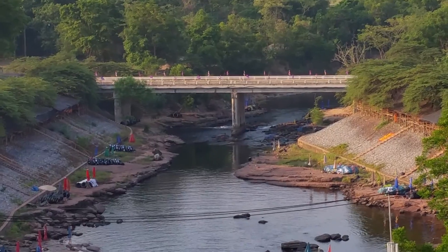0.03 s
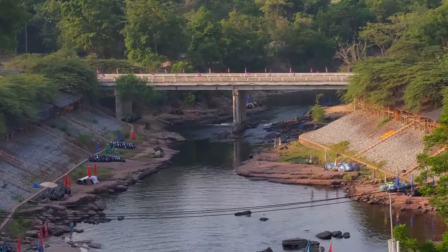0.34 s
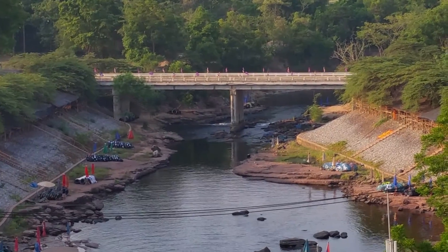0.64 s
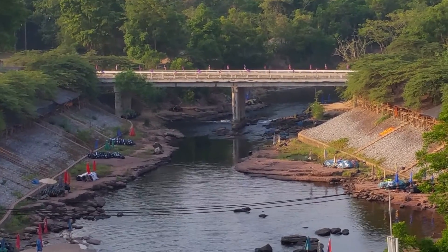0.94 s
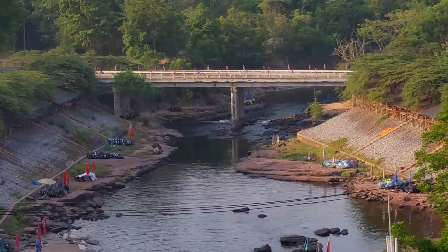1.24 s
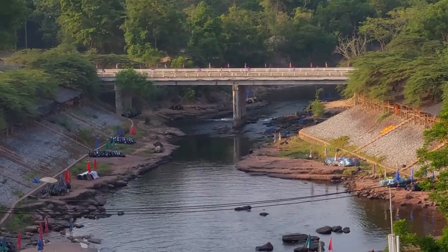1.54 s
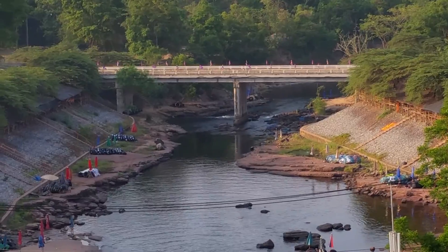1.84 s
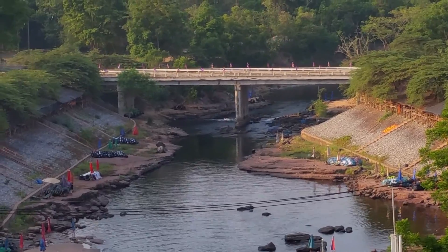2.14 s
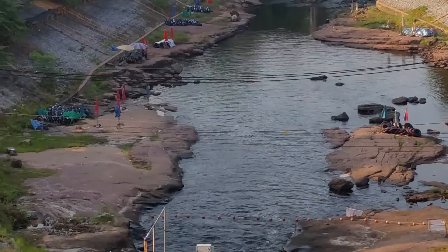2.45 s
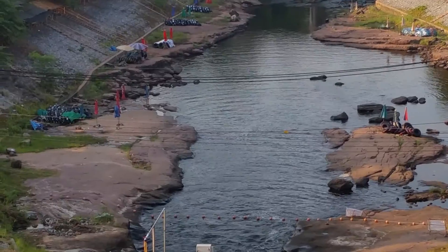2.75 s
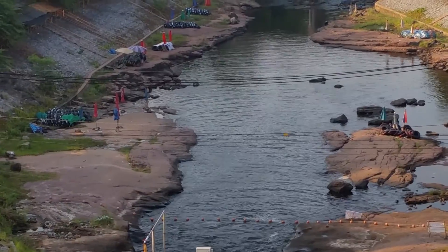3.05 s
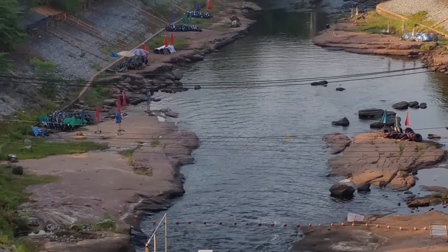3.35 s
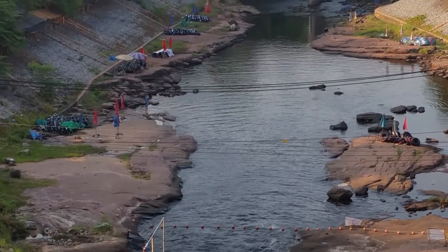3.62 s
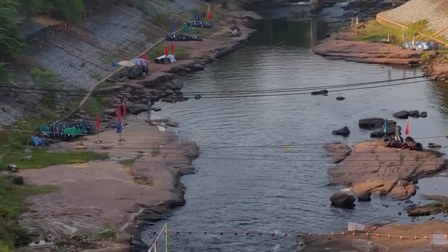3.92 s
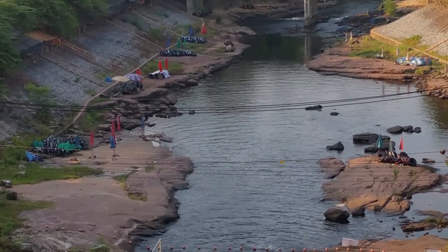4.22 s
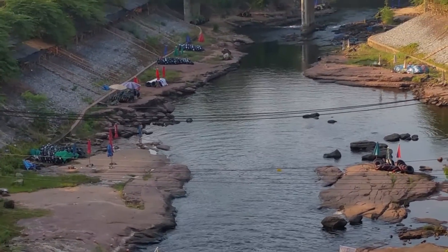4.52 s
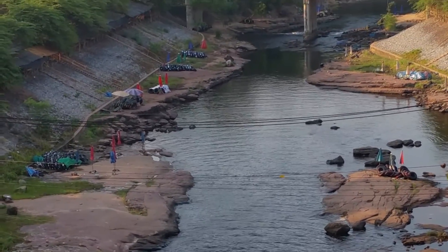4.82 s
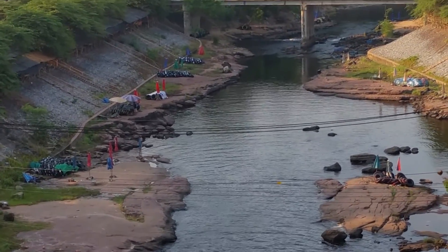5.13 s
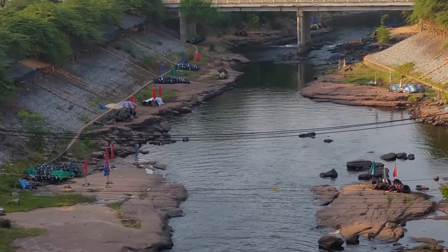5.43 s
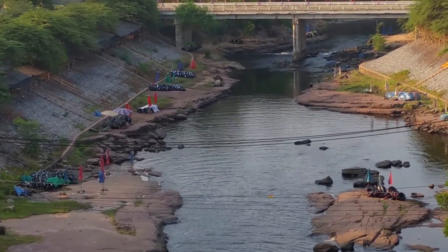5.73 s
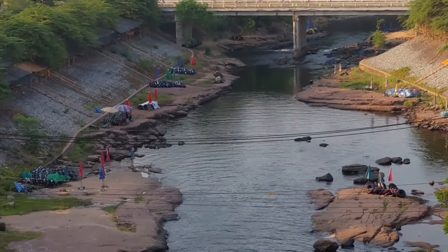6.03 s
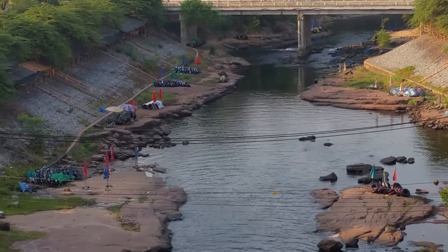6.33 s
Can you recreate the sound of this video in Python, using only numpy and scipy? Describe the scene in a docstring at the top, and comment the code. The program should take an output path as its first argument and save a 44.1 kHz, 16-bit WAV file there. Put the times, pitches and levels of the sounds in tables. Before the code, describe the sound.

Outdoors above a river, wind buffets the microphone from the start. Strong gusts follow one another for about 2.5 seconds, making a low, fluttering rumble that is heavier on the right. Three faint pairs of ticks sound at about 0.1, 0.6 and 1.2 seconds. Two short knocks jolt the microphone at about 2.2 and 2.4 seconds. After that, only light gusts pass over a steady fine hiss and the soft murmur of the river far below. Faint, narrow wisps of high hiss swell briefly on the right near 0.2, 1.6, 3.3 and 3.8 seconds. A far motor's faint, wavering hum drifts in and out between roughly 4.4 and 5.6 seconds. At about 6.4 seconds a faint hollow tap and a slight high sizzle come just before a last sharp knock on the microphone.

```python
"""Wind buffets the two ports of a camera microphone: eddies carried past each port make it rumble.
Strong gusts follow one another for 2.5 s, then light ones pass over a steady hiss, the murmur of a
river far below and a far motor's hum. Faint ticks come in pairs at first, and narrow bands of high
hiss swell briefly. A few short knocks jolt the microphone, the last just after a tap and a sizzle."""
import sys
import numpy as np
from scipy import signal
from scipy.fft import rfft, irfft
from scipy.io import wavfile
from scipy.ndimage import uniform_filter1d, map_coordinates

SR = 44100
rng = np.random.default_rng(int(sys.argv[2]) if len(sys.argv) > 2 else 0)


def store_wav(level_fs):
    """Save 16-bit WAV to argv[1]."""
    pcm = np.round(np.clip(np.atleast_2d(level_fs), -1, 1) * 32767)
    wavfile.write(sys.argv[1], SR, pcm.T.astype(np.int16))


N = 285327
TIME = np.arange(N) / SR
HZ = np.fft.rfftfreq(N, 1 / SR)


def amp(db):
    """Decibels to gain."""
    return 10 ** (np.asarray(db) / 20)


def unit_rms(x):
    """Scales to rms 1."""
    return x / np.sqrt(np.mean(x ** 2) + 1e-20)


def bell(at_s, half_s):
    """Gaussian rise to 1 and fall around a moment."""
    return np.exp(-((TIME - at_s) / half_s) ** 2)


def log_interp(points, hz):
    """Reads a table on a log-frequency axis."""
    point_hz, value = np.transpose(points)
    return np.interp(np.log(hz + 1), np.log(point_hz), value)


def noise(spectrum, size=N):
    """Noise with the given power density in dB."""
    gain = amp(log_interp(spectrum, np.fft.rfftfreq(size, 1 / SR))) * np.sqrt(SR / 2)
    return irfft(rfft(rng.standard_normal(size)) * gain, size)


def wander(rate_hz):
    """Random drift of rms 1, up to about the given rate."""
    return unit_rms(irfft(rfft(rng.standard_normal(N)) * np.exp(-(HZ / rate_hz) ** 2), N))


def ring(modes, t):
    """Struck modes decaying over the time since the blow."""
    return sum(amp(db - 60 * t / t60_s) * np.sin(2 * np.pi * hz * t) for hz, db, t60_s in modes)


def river(ripple_db=0.24, ripple_hz=5, swell_db=-55.5):
    """Far rapids blur into a murmur, much alike at both ports, with one hollow swell."""
    # Each row: frequency in Hz, density in dB.
    rapids = [(60, -63), (170, -69), (250, -72), (340, -75), (500, -84.5), (620, -80), (780, -79),
              (1030, -83.5), (1190, -88.5), (1420, -84), (1920, -93), (2600, -88), (4500, -108),
              (9000, -135)]
    # Each row: frequency in Hz, left-right coherence 0-1.
    likeness = [(200, 1), (750, 0.87), (1200, 0.64), (2000, 0.068), (3500, 1)]
    # Each row: frequency in Hz, relative level in dB.
    swell_colour = [(450, -37), (680, -4), (800, -1), (950, -7), (1400, -17), (3000, -70)]
    coherence = log_interp(likeness, HZ)
    left = noise(rapids)
    right = irfft(coherence * rfft(left) + np.sqrt(1 - coherence ** 2) * rfft(noise(rapids)), N)
    swell = amp(swell_db) * bell(at_s=4.86, half_s=0.23) * unit_rms(noise(swell_colour))
    return np.array([left, right]) * amp([[0.2], [-0.2]]) * amp(ripple_db * wander(ripple_hz)) + swell


def hiss(flicker_db=0.74, flicker_hz=25, dip_db=-1.3, treble_hz=9500):
    """Fine hiss coloured by each port's cavity; lower and duller during the strong gusts."""
    # Each row: frequency in Hz, density in dB.
    left_colour = [(1000, -110), (2200, -96.5), (2750, -86.5), (3100, -90.5), (3500, -78.5), (3850, -79),
                   (4250, -83.5), (4900, -100), (6300, -109), (7600, -115), (9000, -109), (12500, -111),
                   (14500, -117)]
    right_colour = [(1000, -110), (2200, -95), (2900, -90.5), (4200, -92.5), (5100, -97.5), (6700, -96),
                    (7600, -99.5), (8900, -93), (10200, -96), (11400, -104), (12500, -106), (14000, -120)]
    # Each row: time in seconds, treble gain in dB.
    treble_curve = [(0, -4.5), (.8, -1.5), (1.6, -3), (2.05, -3.5), (2.9, 0.5), (4.2, -0.1), (6.4, 0.5)]
    level_db = dip_db * bell(at_s=1.43, half_s=1.0)
    whole = np.array([noise(colour) * amp(level_db + flicker_db * wander(flicker_hz))
                      for colour in (left_colour, right_colour)])
    body = irfft(rfft(whole) / (1 + (HZ / treble_hz) ** 10), N)
    return body + (whole - body) * amp(np.interp(TIME, *np.transpose(treble_curve)))


def motor(pitch_hz=242.3, level_db=-48, waver=0.017, waver_hz=9, fading_db=2):
    """A far motor's single tone drifts in and out, wavering and fading in the moving air."""
    turns = np.cumsum(pitch_hz * (1 + waver * wander(waver_hz))) / SR
    envelope = bell(at_s=4.977, half_s=0.6) * amp(level_db + fading_db * wander(waver_hz))
    return np.sqrt(2) * np.sin(2 * np.pi * turns) * envelope


def shimmer(width_hz=420, flutter=0.44, flutter_hz=35):
    """Narrow bands of high hiss, perhaps far insects, swell, flutter and fade on the right."""
    # Each row: time in seconds, half length in seconds, level in dB, centre in Hz.
    swells = [(.18, .09, -66, 6100), (1.578, 0.055, -62, 6045), (3.332, 0.073, -63, 8500),
              (3.8, .16, -63.5, 8733)]
    out = np.zeros(N)
    for at_s, half_s, db, hz in swells:
        band = irfft(rfft(rng.standard_normal(N)) * np.exp(-((HZ - hz) / width_hz) ** 2), N)
        out += amp(db) * bell(at_s, half_s) * unit_rms(band)
    return out * unit_rms(np.exp(flutter * wander(flutter_hz))) * amp([[-20], [0]])


def sizzle(level_db=-60.5, roughness=0.54, rough_hz=120):
    """The top of the hiss flares unevenly for a moment, mostly on the right."""
    # Each row: frequency in Hz, relative level in dB.
    colour = [(5000, -41.5), (9000, -4), (12000, 1), (14500, 3)]
    envelope = amp(level_db) * bell(at_s=6.38, half_s=0.093) * np.exp(roughness * wander(rough_hz))
    return envelope * unit_rms(noise(colour)) * amp([[-4], [0]])


def tap(at_s=6.3795, rise_s=0.00072):
    """One faint, hollow tap: two decaying modes, slightly louder on the left."""
    t = np.maximum(TIME - at_s, 0)
    hollow = ring([(888, -36.5, 0.033), (1554, -41, 0.026)], t)
    return hollow * (1 - np.exp(-t / rise_s)) * amp([[1], [-1]])


def ticks(rise_s=0.00098, decay_s=0.0023, tail_db=-13, tail_s=0.032, ring_rise_s=0.0043):
    """Faint pairs of ticks, a ringing one then a drier one, mixing a rasp and a short ring."""
    # Each row: start in seconds, level in dB, ringing share 0-1.
    hits = [(.098, -41, 0.7), (0.153, -38, 0), (.627, -37, 0.5), (.682, -40, 0.2), (1.153, -36, 0.81),
            (1.209, -39.5, 0.27)]
    # Each row: frequency in Hz, relative level in dB.
    rasp_colour = [(900, 5), (1500, -1.5), (2050, 6.5), (2500, 4), (3100, -10), (3900, -2), (4700, -19),
                   (6100, -13), (7500, -21), (12000, -35)]
    # Each row: frequency in Hz, relative level in dB, t60 in seconds.
    modes = [(1094, -3.5, 0.053), (1580, -5, 0.035), (2085, -2.5, 0.04)]
    rasp = unit_rms(noise(rasp_colour))
    out = np.zeros(N)
    for at_s, db, ring_share in hits:
        t = np.maximum(TIME - at_s, 0)
        decay = np.exp(-t / decay_s) + amp(tail_db) * np.exp(-t / tail_s)
        scrape = rasp * (1 - np.exp(-t / rise_s)) * decay
        pitched = ring(modes, t) * (1 - np.exp(-(t / ring_rise_s) ** 2))
        out += amp(db) * (np.sqrt(1 - ring_share) * scrape + np.sqrt(ring_share) * pitched)
    return out * amp([[-2], [3]])


def knocks(decay_s=0.0063, slowing_s=0.0068, phase_rad=0.35):
    """The microphone's bass cut turns each pressure step into a short, slowing swing; the port snaps."""
    # Each row: start in seconds, level in dB, rise in seconds, initial swing in Hz, port (0 is left).
    jolts = [(2.2328, -13.5, 0.00016, 190.6, 1), (2.233, -33, .00014, 248.4, 0),
             (2.3824, -18, 0.0000086, 105, 1), (6.4333, -9, .00016, 160, 1),
             (6.4335, -12.5, 0.00026, 246, 0)]
    # Each row: frequency in Hz, level relative to the knock in dB, t60 in seconds.
    snap_modes = [(2570, -16.5, .003)]
    out = np.zeros((2, N))
    for at_s, db, rise_s, hz, port in jolts:
        t = np.maximum(TIME - at_s, 0)
        step = 1 - np.exp(-(t / rise_s) ** 2)
        turns = hz * slowing_s * np.log1p(t / slowing_s)
        swing = step * np.exp(-t / decay_s) * np.cos(2 * np.pi * turns + phase_rad)
        snap = ring(snap_modes, np.maximum(t - rise_s, 0))
        out[port] += amp(db) * (swing + snap)
    return out


def airflow(breeze_db=(-36.5, -40), breeze_speed=0.85, attack_s=0.01813, release_s=0.094):
    """Gusts rise, hold and die over a breeze. Returns rumble in dB per port and relative air speed."""
    # Each row: start in seconds, length in seconds, left and right rumble in dB, relative air speed.
    gusts = [(-.04, 0.11, -18, -18.5, 1.067), (.058, 0.43, -31, -14.5, 0.89),
             (0.562, 0.13, -20.5, -19, 1.093), (.731, 0.0773, -25, -23.5, .88), (.935, .11, -21, -18, 0.97),
             (1.104, 0.245, -29.5, -18.5, 1.02), (1.354, 0.3, -23.5, -12, 1.158),
             (1.669, 0.36, -19.5, -12.5, 1.03), (2.073, 0.28, -25.5, -19.5, 1.16),
             (2.374, 0.086, -18.5, -33, 1.075), (2.619, .57, -26.5, -38.5, .9),
             (3.479, 0.53, -28.5, -41.5, 0.93), (4.007, 0.2435, -30.5, -31, .78),
             (4.459, 0.58, -33, -29.5, .7), (5.264, 0.072, -30.5, -33.5, .8), (5.732, .13, -30, -48, 0.79),
             (6.168, 0.16, -33, -28.5, 0.68), (6.416, 0.043, -21.5, -28.5, 0.78)]
    power = amp(breeze_db)[:, None] ** 2 * np.ones(N)
    weighted_speed = breeze_speed * power.sum(0)
    for start_s, length_s, left_db, right_db, speed in gusts:
        t = np.maximum(TIME - start_s, 0)
        envelope = (1 - np.exp(-t / attack_s)) * np.exp(-np.maximum(t - length_s, 0) / release_s)
        gust_power = (amp([[left_db], [right_db]]) * envelope) ** 2
        power += gust_power
        weighted_speed += speed * gust_power.sum(0)
    return 10 * np.log10(power), weighted_speed / power.sum(0)


def wind(port, level_db, speed, lumpiness=0.115, lump_hz=75, lump_db=2.06,
         sway_db=0.25, sway_hz=7, steadiness=0.37, bass_cut_hz=42, trim_db=-1.14):
    """A frozen field of eddies is carried past one port: faster air sounds brighter."""
    # Eddy spectrum at air speed 1. Each row: frequency in Hz, relative level in dB.
    eddies = [(15, -14), (45, -2.5), (95, 3.5), (135, -2), (210, -9.5), (320, -22.5), (500, -37),
              (800, -61.5), (1400, -66), (3000, -100)]
    # Single fast eddies that slap a port. Each row: time in seconds, half length in seconds,
    # fractional speed rise, gain in dB, port (0 is left).
    buffets = [(0.061, .011, 0.87, 2.5, 1), (0.27, 0.0094, 0.51, 2, 1), (0.512, 0.015, 0.052, 9, 1),
               (.626, .018, .65, 2.5, 1), (0.669, 0.015, .15, 5.5, 1), (0.953, 0.0085, 0.4, 9.5, 1),
               (1.032, .011, 0.25, -3, 1), (1.083, 0.0077, 0.45, 5.5, 1), (1.359, 0.0054, 1.245, -4, 1),
               (1.454, 0.007, 0.38, -3.5, 1), (1.511, .0037, 1.31, -6, 1), (1.535, 0.0066, 1.15, -5, 1),
               (1.571, 0.0077, .57, -2.5, 1), (1.612, 0.0049, 1.53, -6, 1), (1.704, 0.0043, 1.051, 2, 1),
               (1.861, 0.0053, 0.53, 2, 1), (1.927, 0.0084, 0.38, 4.5, 1), (2.044, .008, 1.38, 2, 1),
               (0.654, .016, 0.38, 2, 0), (1.022, 0.017, 0.38, 1.5, 0), (1.835, .014, .35, 5, 0),
               (1.931, 0.007, 0.52, -2, 0), (2.41, 0.013, .1, 7, 0), (2.455, 0.0086, .3, 2.5, 0),
               (3.143, .02, 0.14, 8.5, 0), (3.508, 0.0099, .25, 10.5, 0), (3.719, 0.032, 0.049, 3, 0),
               (4.78, .03, 0.099, 7, 1)]
    lumps = wander(lump_hz)
    for at_s, half_s, speed_rise, db, side in buffets:
        slap = bell(at_s, half_s) * (side == port)
        speed = speed * (1 + speed_rise * slap)
        level_db = level_db + db * slap
        lumps *= 1 - slap  # a big eddy displaces the small ones
    travel = np.cumsum(speed * np.exp(lumpiness * lumps))
    pressure = map_coordinates(noise(eddies, size=2 * N), [travel], order=3, mode="wrap")
    mic_bass_cut = signal.butter(2, bass_cut_hz, "highpass", fs=SR, output="sos")
    pressure = unit_rms(signal.sosfilt(mic_bass_cut, pressure))
    # Partly level the eddies' chance grouping, so their strength follows the gust.
    local_power = uniform_filter1d(uniform_filter1d(pressure ** 2, size=2400), size=2400)
    pressure = unit_rms(pressure / (abs(local_power) + 1e-6) ** (steadiness / 2))
    return pressure * amp(level_db + lump_db * lumps + sway_db * wander(sway_hz) + trim_db)


def scene():
    """Wind at each port over the river, hiss, motor and small events."""
    rumble_db, speed = airflow()
    rumble = np.array([wind(port, rumble_db[port], speed) for port in range(2)])
    background = river() + hiss() + motor()
    return rumble + background + knocks() + ticks() + tap() + sizzle() + shimmer()


def record(dry, edge_hz=14600):
    """The recorder's band limit: a steep low-pass."""
    lowpass = signal.firwin(511, edge_hz, window=("kaiser", 9), fs=SR)
    return signal.oaconvolve(dry, lowpass[None], "same")


dry = scene()
out = record(dry)
store_wav(out)
```